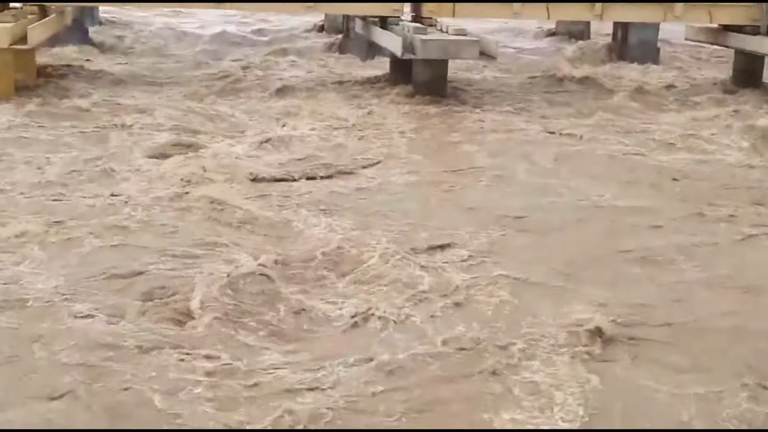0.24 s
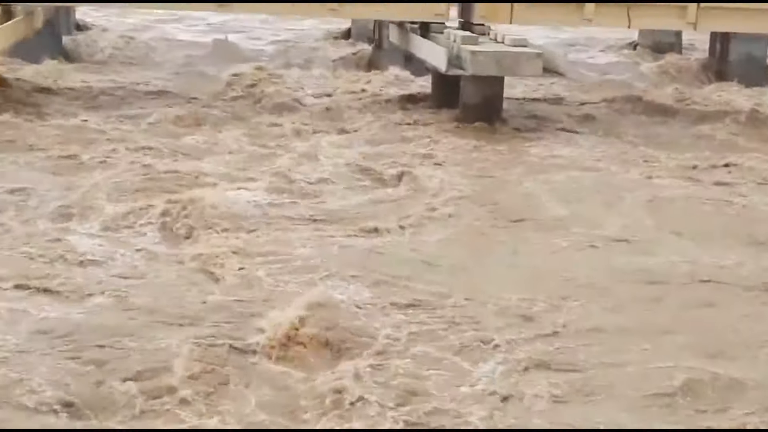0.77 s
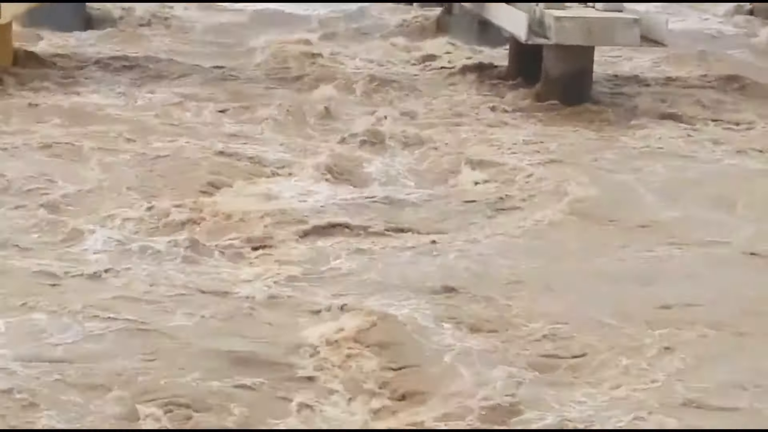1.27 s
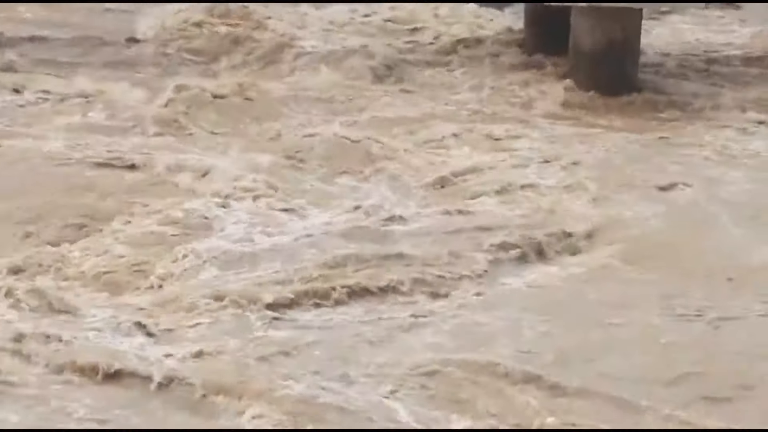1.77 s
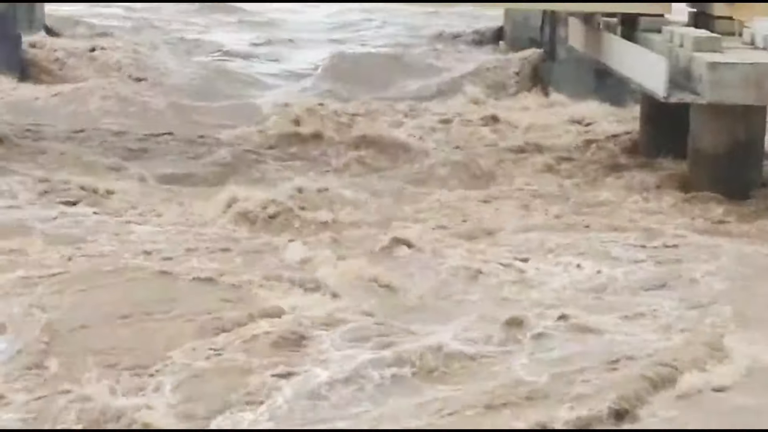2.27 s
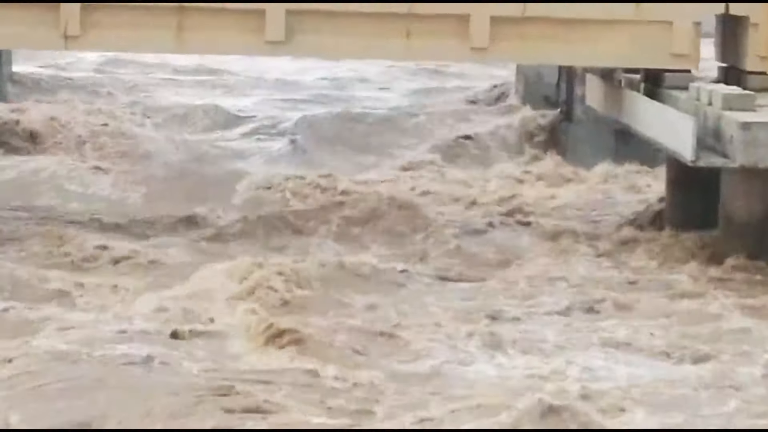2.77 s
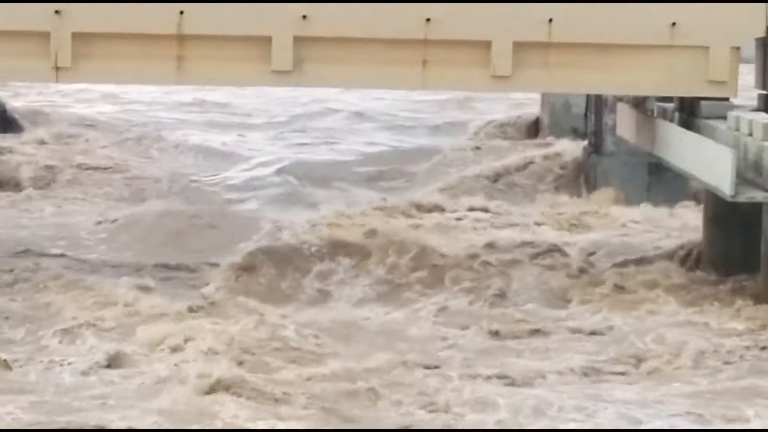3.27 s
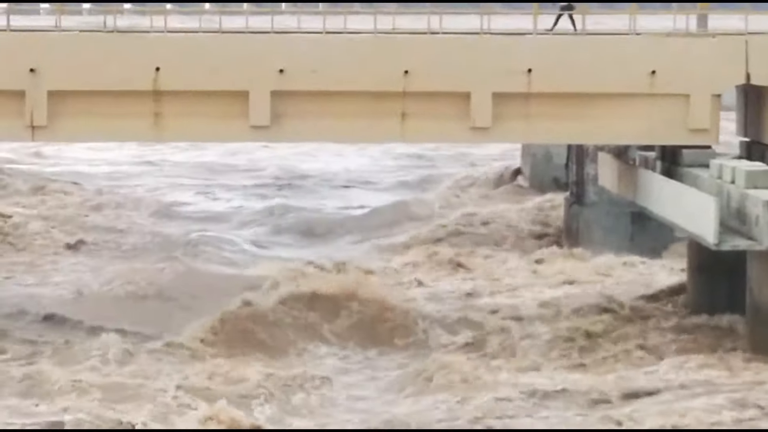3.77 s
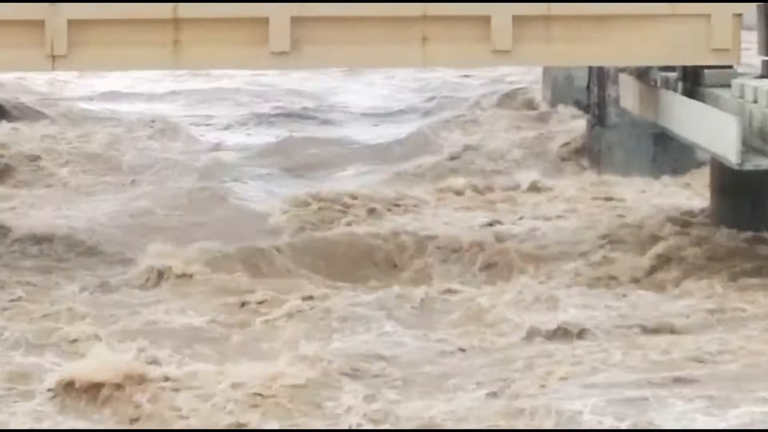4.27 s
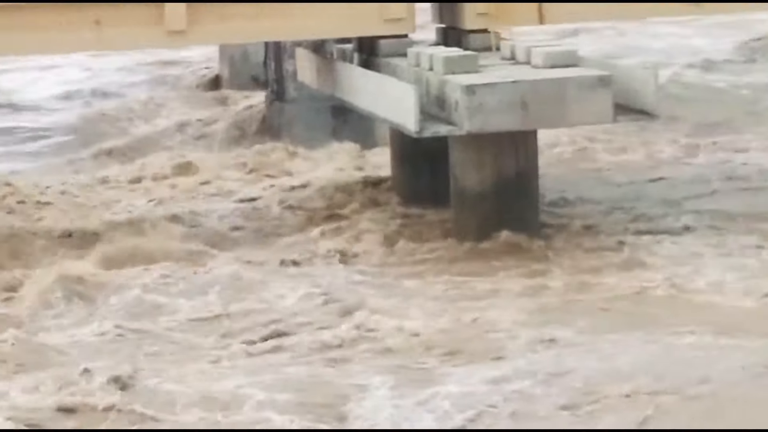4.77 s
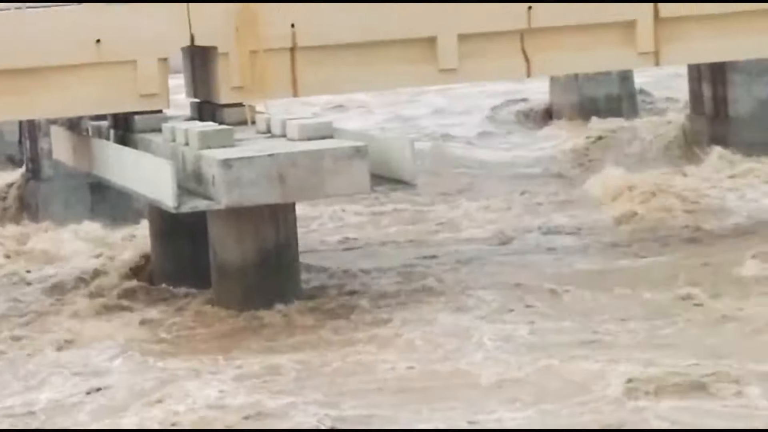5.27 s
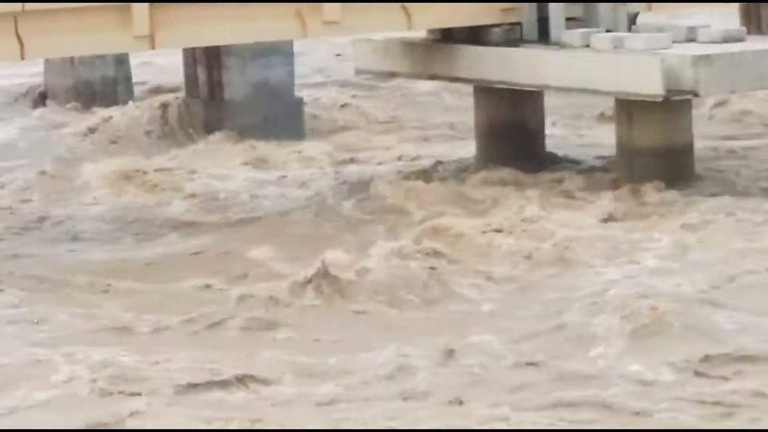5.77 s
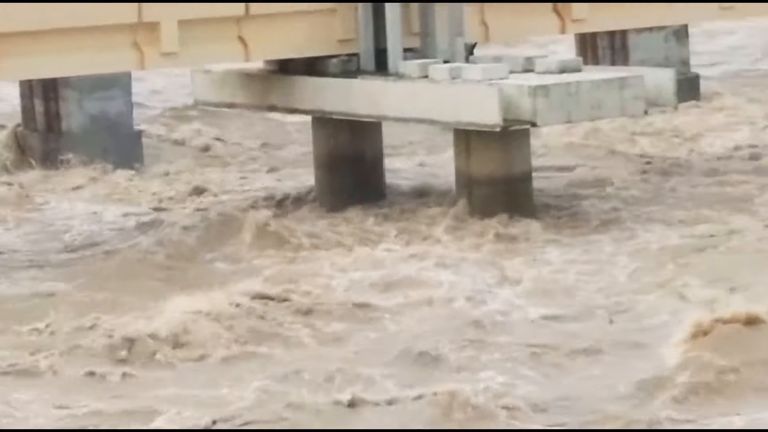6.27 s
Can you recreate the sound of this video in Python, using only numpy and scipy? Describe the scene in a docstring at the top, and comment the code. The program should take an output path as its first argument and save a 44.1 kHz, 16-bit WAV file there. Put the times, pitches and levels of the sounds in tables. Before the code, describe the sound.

A wide, rather quiet pickup of a swollen river: dull rumble, dense gurgling and fluttering thin fizz, with two minute crackles after one second. Just past two seconds the sound changes instantly to a far louder close pickup, dominated by bright, noise-suppressed rushing hiss with grainy, watery texture, over a stronger low roar. It continues with only slight swells, cut off without fading.

```python
"""A river in flood churns round bridge piers, with foam and spray fizzing on top.
At first clouds of air throb in a dull roar and bubbles gurgle, as resonators struck by random clicks in noise.
Foam adds a faint, fluttering sizzle of gapped treble noise; just after one second come two small noise ticks.
After two seconds the microphone's response switches abruptly, as when it zooms in: roar and gurgle step up,
and the spray, noise and clicks through stepped bands and a noise suppressor, is a loud, hard, watery hiss."""
import sys
import numpy as np
from scipy import signal
from scipy.fft import rfft, irfft, next_fast_len
from scipy.io import wavfile

SR = 44100
rng = np.random.default_rng(int(sys.argv[2]) if len(sys.argv) > 2 else 0)


def to_wav(sig):
    """Store sig (one row per channel, or 1-D mono) as 16-bit WAV at the path in sys.argv[1].

    Samples outside -1..1 are clipped; the rate is SR.
    """
    pcm = np.clip(np.atleast_2d(sig), -1, 1) * 32767
    pcm = np.round(pcm).astype(np.int16)
    wavfile.write(sys.argv[1], SR, pcm.T)  # frames by channels


N = 287973
SWITCH_S = 2.1295  # when the microphone response switches
CUTOFF_HZ = 15400  # top of the microphone's range


# Stepped bands of the zoomed response: lower_edge_hz [Hz], centre_level_db [dB per Hz, relative],
# rise_db [dB across the band]
ZOOM_BANDS = [(2176, -14, 5.5), (2800, -9, 4), (4772, -16.5, 5.5), (6042, -2, 3), (6860, -4.5, -1),
              (7710, -13.5, -1.5), (8558, -35.5, -7.5), (9700, -55, -16), (11520, -48, -7),
              (13800, -56, -19)]


def spray(fizz, edge_hz):
    """Band filtering: stepped bands shape the fizz, split into coarse splashing below and fine mist above."""
    lower_edges = [low for low, _, _ in ZOOM_BANDS]
    upper_edges = lower_edges[1:] + [CUTOFF_HZ]
    corners = [(1600, -66)]
    for (low, centre_db, rise_db), high in zip(ZOOM_BANDS, upper_edges):
        corners.append((low + edge_hz, centre_db - rise_db / 2))
        corners.append((high - edge_hz, centre_db + rise_db / 2))
    hiss = coloured(fizz, corners)
    splashing = filtered(hiss, lambda hz: 1 / (1 + (hz / 5400) ** 40))
    mist = hiss - splashing
    splash_db, mist_db = spray_levels()
    return from_db(splash_db) * rms_one(splashing) + from_db(mist_db) * rms_one(mist)


# Slow swell of all the spray: time_s [s], lift_db [dB]
SPRAY_SWELL = [(2.13, 0), (3.4, -.1), (4.2, 0.1), (4.75, 0.8), (4.98, -0.8), (5.45, 0.8), (5.8, -0.55),
               (6.5, 0.85)]
SPLASH_DB, SPLASH_EXTRA_DB = -28.9, 1.0  # settled level, and the extra at the start
SPLASH_EASES_S, SPLASH_EASE_LENGTH_S = 3.03, 0.48
MIST_DB = -22.87
SPRAY_FLICKER_DB, SPRAY_FLICKER_CORNER_HZ = 0.35, 6


def spray_levels():
    """Amplitude modulation: splashing and mist swell together, each with its own flicker; levels in dB."""
    swell_db, = in_time(SPRAY_SWELL)
    eased = np.clip((seconds() - SPLASH_EASES_S) / SPLASH_EASE_LENGTH_S, 0, 1)
    splash_base_db = SPLASH_DB + SPLASH_EXTRA_DB * (1 - eased)
    splash_db = splash_base_db + swell_db + SPRAY_FLICKER_DB * drift(SPRAY_FLICKER_CORNER_HZ)
    mist_db = MIST_DB + swell_db + SPRAY_FLICKER_DB * drift(SPRAY_FLICKER_CORNER_HZ)
    return splash_db, mist_db


# Broad bright patch that moves through the hiss: time_s [s], centre_hz [Hz], lift_db [dB]
BRIGHT_PATCH = [(2.13, 4200, 4), (2.75, 4800, 2.5), (3.05, 4630, 4), (3.4, 3700, 2.5), (4.2, 3720, 0.5)]


def fizzing(drops_per_s, drop_spread_db, drops_db):
    """Superposition of impulses: countless drops and bursting foam cells over a smooth far hiss."""
    far_hiss = rng.standard_normal(N)
    fizz = far_hiss + from_db(drops_db) * grains(drops_per_s, drop_spread_db)
    when, centre_hz, lift_db = np.transpose(BRIGHT_PATCH)

    def bright_patch(hz, s):
        """Moving resonance: a bell-shaped lift in dB round the centre of the patch."""
        offset_hz = hz - np.interp(s, when, centre_hz)
        return np.interp(s, when, lift_db) * np.exp(-(offset_hz / 550) ** 2)
    return reshaped(suppressed(fizz), bright_patch, size=1024)


SUPPRESS_BELOW_DB, SUPPRESS_DEPTH_DB = -3, 20  # threshold relative to a band's mean power
SUPPRESS_FROM_HZ, SUPPRESS_FULL_HZ = 2800, 4200


def suppressed(x):
    """Spectral gating: a noise suppressor shuts narrow treble bands while weak, so the hiss turns watery."""
    hz, _, frames = signal.stft(x, SR, nperseg=1152, noverlap=864)
    power = np.abs(frames) ** 2
    threshold = power.mean(axis=1, keepdims=True) * from_db(SUPPRESS_BELOW_DB) ** 2
    over = power / threshold
    depth = np.interp(hz, [SUPPRESS_FROM_HZ, SUPPRESS_FULL_HZ], [0, 1])
    shut = from_db(-SUPPRESS_DEPTH_DB * depth)[:, None]
    openness = over ** 3 / (1 + over ** 3)
    gain = shut + (1 - shut) * openness
    return signal.istft(frames * gain, SR, nperseg=1152, noverlap=864)[1][:N]


# Colour of the roar before and after the switch: frequency_hz [Hz], level_db [dB per Hz, relative]
ROAR_WIDE = [(13, -77), (22, -47), (50, -19), (75, -19), (86, -10.5), (135, -1.5), (216, -3), (240, -8),
             (277, -3), (366, -7), (395, -11), (539, -12.5), (670, -17), (900, -24), (1170, -51),
             (1980, -120)]
ROAR_ZOOMED = [(13, -64), (22, -45), (54, -43), (71, -13), (92, -7.5), (171, 0.5), (248, -4), (272, -3.5),
               (344, -5), (421, -7), (462, -9.5), (515, -7.5), (610, -11.5), (735, -12), (900, -17.5),
               (1170, -51), (1980, -120)]
# Narrow peaks and dips in the roar: centre_hz [Hz], width_hz [Hz], gain_db [dB]
ROAR_PEAKS = [(71, 6, 8), (81.6, 7.7, -18), (99.5, 3.1, 3), (187, 3.8, 2.5)]
# Bigger waves that break and lift the roar: centre_s [s], lift_db [dB]
WAVES = [(0.24, 2.6), (3.2, 1.4), (3.92, 2.0), (5.99, 2.8)]
WAVE_HALF_S = 0.072
ROAR_WIDE_DB, ROAR_ZOOMED_DB = -39, -36.32  # between waves


def roar(zoomed):
    """Low resonance: clouds of air dragged under at the piers throb over the rumble of the whole river."""
    clouds = bubbles(per_s=700, low_hz=64.8, high_hz=787, cycles=7.8, spread_db=2.5, count=22)
    water = rng.standard_normal(N) + from_db(-19.5) * clouds

    def peaks(hz):
        """Resonance and absorption: the gain of all peaks and dips together."""
        return from_db(sum(db * np.exp(-((hz - at) / width) ** 2) for at, width, db in ROAR_PEAKS))
    water = filtered(water, peaks)
    waves_db = sum(db * np.exp(-((seconds() - s) / WAVE_HALF_S) ** 2) for s, db in WAVES)
    wide = from_db(ROAR_WIDE_DB + waves_db) * coloured(water, ROAR_WIDE)
    close = from_db(ROAR_ZOOMED_DB + waves_db) * coloured(water, ROAR_ZOOMED)
    return wide * (1 - zoomed) + close * zoomed


# Colour of the wash before and after the switch: frequency_hz [Hz], level_db [dB per Hz, relative]
WASH_WIDE = [(600, -15), (900, -2), (1400, -2.5), (2000, -6.5), (3200, -9.5), (5000, -16.5), (8000, -22.5),
             (10500, -27), (12500, -34), (15500, -35)]
WASH_ZOOMED = [(600, -0.5), (880, 0.5), (1100, 0.5), (1500, 2), (1830, 4), (2060, 1.5), (2300, -3.5),
               (3000, -34)]
# Slow swell of the gurgle: time_s [s], lift_db [dB]
GURGLE_SWELL = [(0.0, 0.9), (1.1, -0.2), (2.1, 0), (2.55, -0.7), (3.2, 0.7), (4.55, 0.2), (5.05, -.6),
                (6.3, .5)]
GURGLE_WIDE_DB, GURGLE_ZOOMED_DB = -48.5, -43  # before the swell is added


def gurgle(zoomed):
    """Bubble resonance: single bubbles ring in the breaking waves and merge into a wash."""
    near = bubbles(per_s=1400, low_hz=625, high_hz=3190, cycles=46, spread_db=2.5, count=40)
    water = rng.standard_normal(N) + from_db(-11.5) * near
    swell_db, = in_time(GURGLE_SWELL)
    wide = from_db(GURGLE_WIDE_DB + swell_db) * coloured(water, WASH_WIDE)
    close = from_db(GURGLE_ZOOMED_DB + swell_db) * coloured(water, WASH_ZOOMED)
    return wide * (1 - zoomed) + close * zoomed


# Colour of the foam's fizz: frequency_hz [Hz], level_db [dB per Hz, relative]
SIZZLE = [(2500, -30), (3600, -2.5), (4500, -1), (5500, 0), (6300, 5), (7000, 2), (7700, 1), (8300, -4.5),
          (9000, -13.5), (9700, -15.5), (11000, -38), (13000, -50)]


def sizzle(gap_db, full_bias):
    """Gated noise: a faint fizz of foam holds a ceiling and drops out in broad, short gaps."""
    def flutter(hz, s):
        """Soft thresholding of chance: gain in dB, with rarer gaps towards the top of the sizzle."""
        bias = full_bias * np.clip((hz - 6000) / 1000, 0, 1)
        chance = patches(hz, s, width_hz=620, life_s=.0095) + bias
        return gap_db * (1 - np.tanh(2 * chance)) / 2
    fizz = coloured(reshaped(rng.standard_normal(N), flutter, size=256), SIZZLE)
    lower = filtered(fizz, lambda hz: 1 / (1 + (hz / 6800) ** 30))
    upper = fizz - lower
    lower_db, upper_db = sizzle_levels()
    return from_db(lower_db) * rms_one(lower) + from_db(upper_db) * rms_one(upper)


# Swell of the upper sizzle before the switch: time_s [s], level_db [dB, before a trim of -0.3 dB]
SIZZLE_SWELL = [(0.0, -48.5), (0.6, -51), (1.38, -48.5), (1.6, -53), (1.9, -47.5), (2.11, -47.5)]
SIZZLE_LOWER_DB, SIZZLE_LOWER_FOLLOWS = -53, .3  # mean level, and share of the swell


def sizzle_levels():
    """Amplitude modulation: lower and upper levels in dB; the lower part follows the swell only partly."""
    swell_db, = in_time(SIZZLE_SWELL)
    swing_db = swell_db - swell_db[seconds() < SWITCH_S].mean()
    return SIZZLE_LOWER_DB + SIZZLE_LOWER_FOLLOWS * swing_db, swell_db - 0.3


# Small sharp ticks: start_s [s], level_db [dB], length_s [s]
TICKS = [(1.2095, -42, .002), (1.315, -37, 0.004)]
# Colour of the ticks: frequency_hz [Hz], level_db [dB per Hz, relative]
TICK_COLOUR = [(2000, -25), (4500, -5), (6000, -3), (7500, 5), (9500, -8), (13000, -18), (15500, -23)]


def ticks():
    """Noise burst: each tick is a bright crackle a few milliseconds long."""
    t = seconds()
    bursts = sum(from_db(db) * ((t >= s) & (t < s + length)) for s, db, length in TICKS)
    return bursts * coloured(rng.standard_normal(N), TICK_COLOUR)


# Dull low surges: centre_s [s], level_db [dB], half_length_s [s]
SURGES = [(2.35, -54, .05), (3.84, -41, .06), (5.88, -51, .04)]
# Colour of the surges: frequency_hz [Hz], level_db [dB per Hz, relative]
SURGE_COLOUR = [(20, -31), (50, -4), (75, 11), (110, -14), (200, -34), (600, -87)]


def surges():
    """Enveloped low noise: now and then the rumble swells briefly along a bell curve."""
    swell = sum(from_db(db) * np.exp(-((seconds() - s) / half) ** 2) for s, db, half in SURGES)
    return swell * coloured(rng.standard_normal(N), SURGE_COLOUR)


def bubbles(per_s, low_hz, high_hz, cycles, spread_db, count):
    """Damped resonance: bubbles of many sizes decay 60 dB in some cycles; even power per Hz, rms 1."""
    births = grains(per_s, spread_db)
    dealt = rng.integers(0, count, N)  # the size of bubble each birth goes to
    faint = 1e-12 * (np.arange(N) % 3)  # keeps a size without births from being silent
    out = 0
    for k, hz in enumerate(np.geomspace(low_hz, high_hz, count)):
        radius = from_db(-60 * hz / (cycles * SR))
        angle = 2 * np.pi * hz / SR
        poles = [1, -2 * radius * np.cos(angle), radius * radius]
        rung = signal.lfilter([1, 0, -1], poles, births * (dealt == k) + faint)
        out = out + np.sqrt(hz) * rms_one(rung)
    return rms_one(out)


def grains(per_s, spread_db):
    """Random impulses: clicks at chance moments, many small and a few large; rms 1."""
    sizes = from_db(spread_db * np.minimum(rng.exponential(1, N), 4))
    signs = rng.choice([-1, 1], N)
    return rms_one(sizes * signs * (rng.random(N) < per_s / SR))


def patches(hz, s, width_hz, life_s):
    """Smoothed random field: patches of a given width and life over pitch and time; rms 1."""
    field = rng.standard_normal((len(hz), len(s)))
    steps = np.arange(-20, 21)
    across = np.exp(-(steps * hz[1, 0] / width_hz) ** 2)
    along = np.exp(-(steps * s[1] / life_s) ** 2)
    return rms_one(signal.fftconvolve(field, np.outer(across, along), "same"))


def drift(corner_hz):
    """Low-passed noise: slow chance of rms 1, computed at every 40th sample and interpolated."""
    r = np.exp(-2 * np.pi * corner_hz * 40 / SR)
    noise = rng.standard_normal(N // 40 + 2002)
    slow = signal.lfilter([1], [1, -2 * r, r * r], noise)[2000:]  # drop the run-in
    return np.interp(np.arange(N) / 40, np.arange(len(slow)), rms_one(slow))


def reshaped(x, gain_db_at, size):
    """Time-varying filtering: a gain in dB that depends on frequency and time."""
    overlap = size * 3 // 4
    hz, s, frames = signal.stft(x, SR, nperseg=size, noverlap=overlap)
    shaped = frames * from_db(gain_db_at(hz[:, None], s))
    return signal.istft(shaped, SR, nperseg=size, noverlap=overlap)[1][:N]


def coloured(x, points):
    """Spectral shaping: levels in dB joined along log frequency; rms 1."""
    at, level = np.transpose(points)
    return rms_one(filtered(x, lambda hz: from_db(np.interp(np.log(hz), np.log(at), level))))


def filtered(x, gain_at):
    """Linear filtering: multiplies the spectrum by a gain that is a function of frequency."""
    size = next_fast_len(N, real=True)
    hz = np.maximum(np.arange(size // 2 + 1) * SR / size, 1)
    return irfft(rfft(x, size) * gain_at(hz), size)[:N]


def in_time(rows):
    """Linear interpolation: each column of a curve, sample by sample."""
    s, *columns = np.transpose(rows)
    return [np.interp(seconds(), s, c) for c in columns]


def seconds():
    """Sampling: the time of every sample in seconds."""
    return np.arange(N) / SR


def from_db(db):
    """Decibel law: level in dB to amplitude."""
    return 10 ** (np.asarray(db) / 20)


def rms_one(x):
    """Normalisation: scales to a root mean square of 1."""
    return x / np.sqrt(np.mean(x ** 2) + 1e-20)


def scene():
    """Superposition: the river sounds throughout; foam and ticks give way to spray at the switch."""
    zoomed = np.clip((seconds() - SWITCH_S) / .0005, 0, 1)  # 0 before the switch, 1 after
    fizz = fizzing(drops_per_s=6000, drop_spread_db=1.5, drops_db=-3.5)
    loud_spray = spray(fizz, edge_hz=94)
    river = roar(zoomed) + gurgle(zoomed) + surges()
    faint_foam = sizzle(gap_db=-12.0, full_bias=0.6) + ticks()
    return (river + faint_foam * (1 - zoomed) + loud_spray * zoomed)[None]


def record(dry):
    """Band limiting: the deepest rumble is rolled off and the top is cut steeply."""
    rumble_cut = signal.butter(2, 48, "high", fs=SR, output="sos")
    top_cut = signal.ellip(10, .1, 80, CUTOFF_HZ, fs=SR, output="sos")
    return signal.sosfilt(top_cut, signal.sosfilt(rumble_cut, dry))


dry = scene()
out = record(dry)
to_wav(out)
```